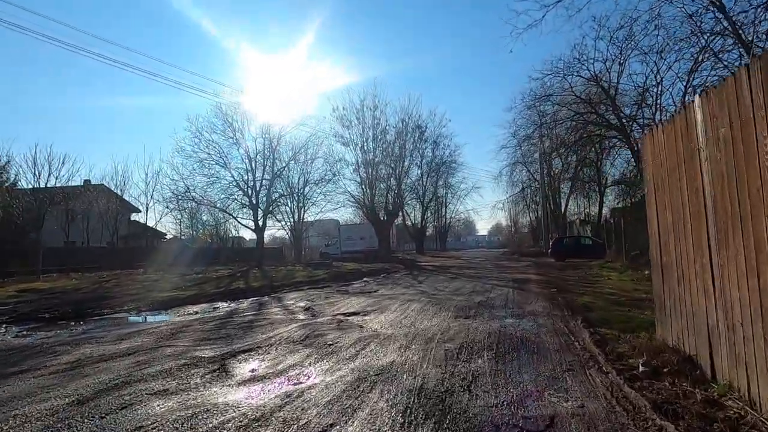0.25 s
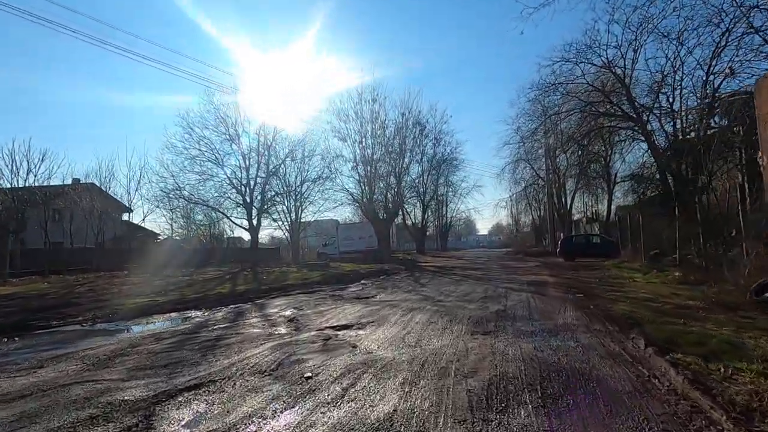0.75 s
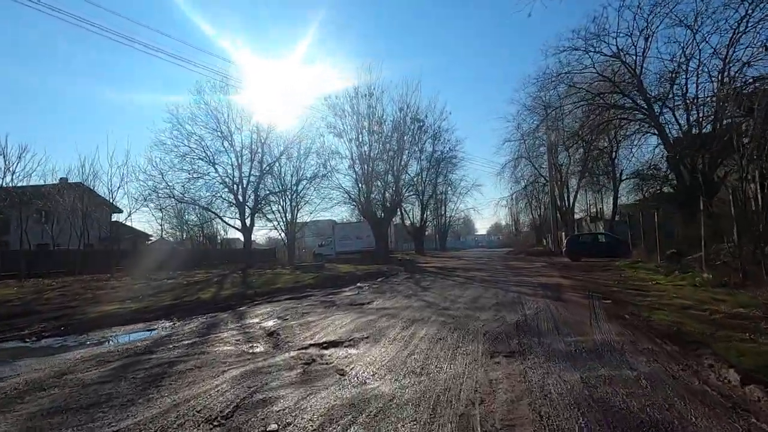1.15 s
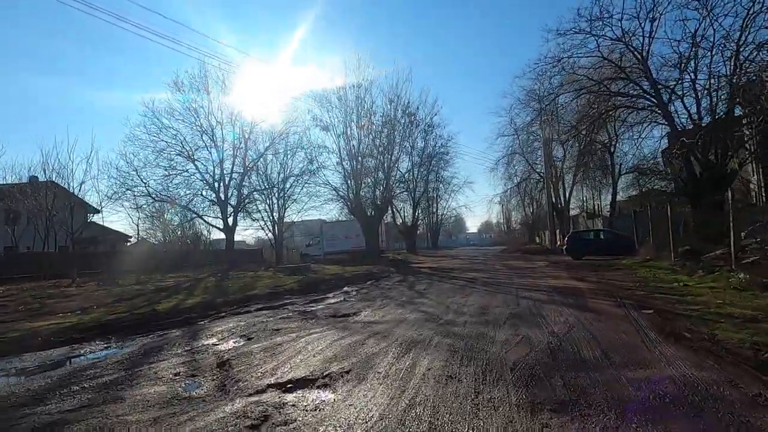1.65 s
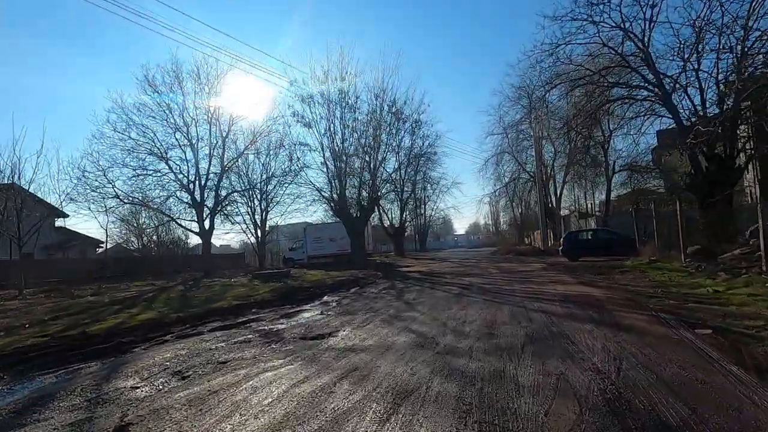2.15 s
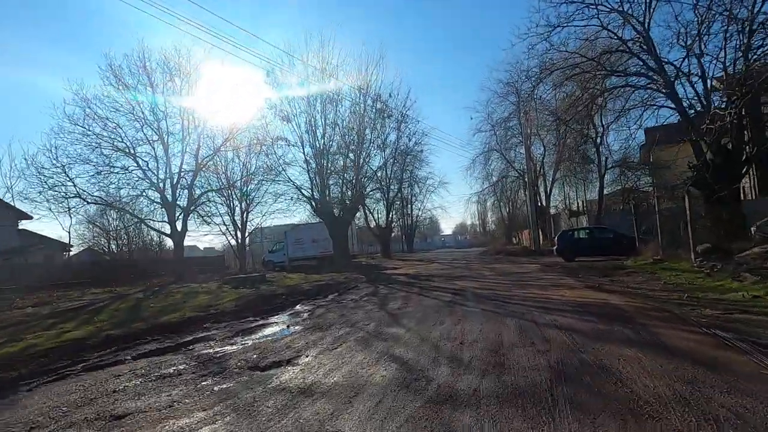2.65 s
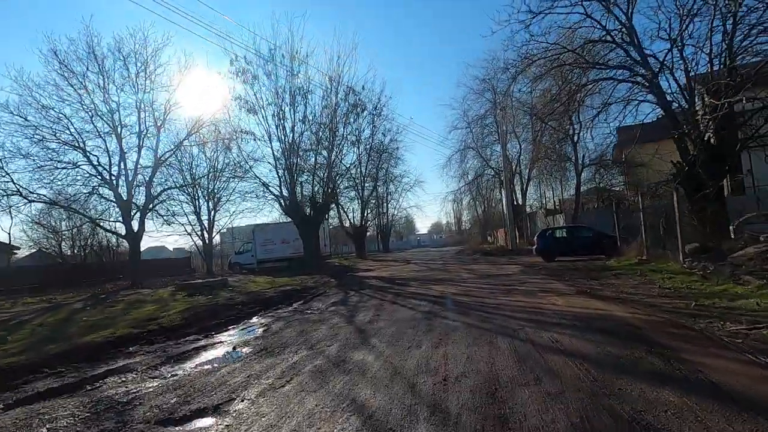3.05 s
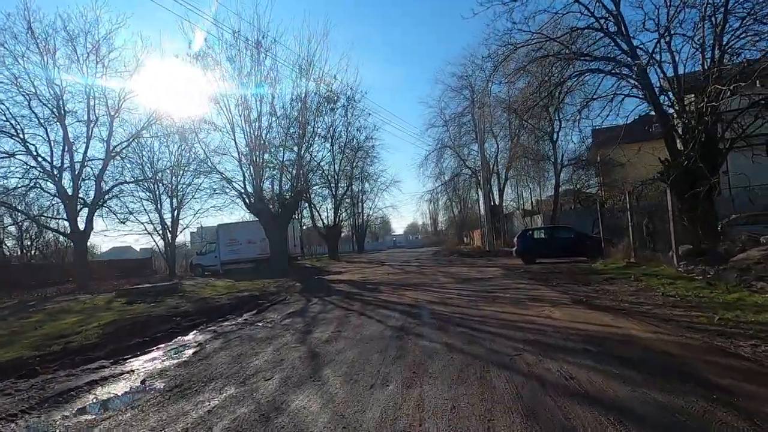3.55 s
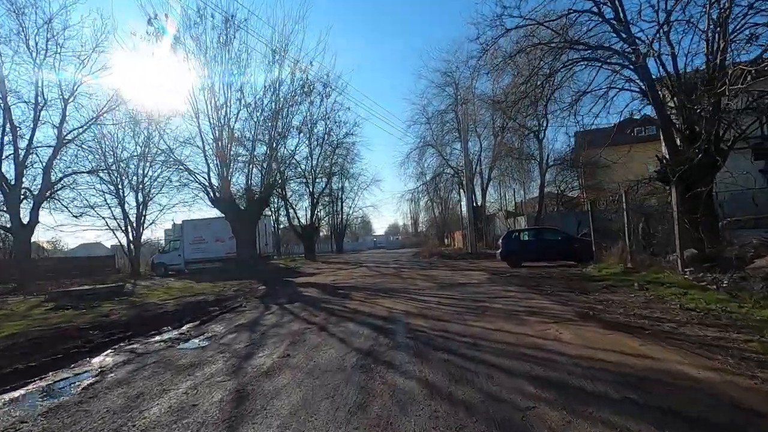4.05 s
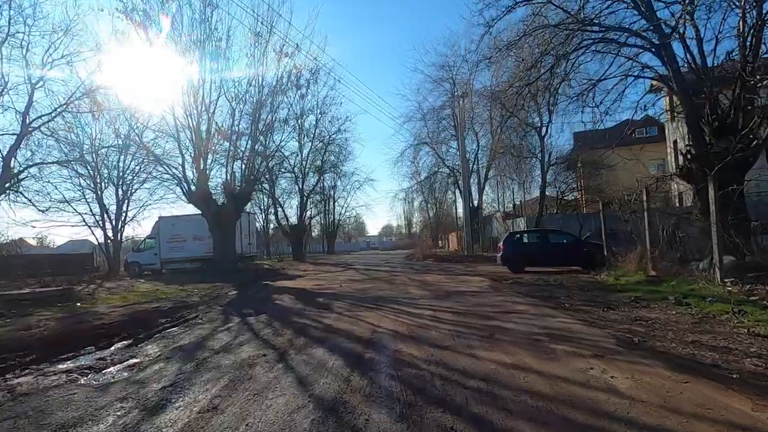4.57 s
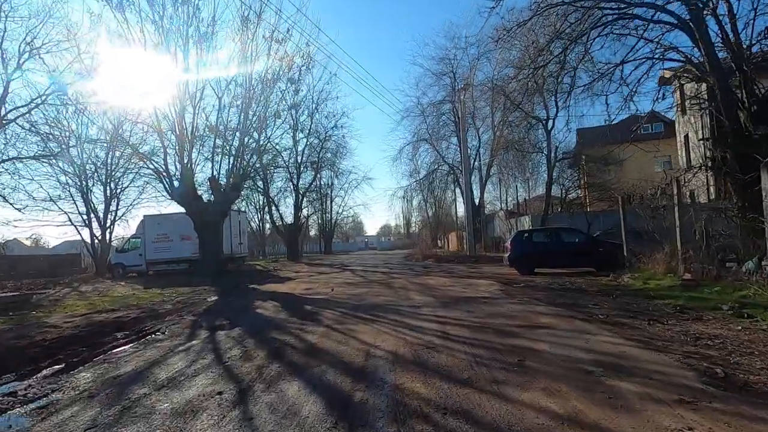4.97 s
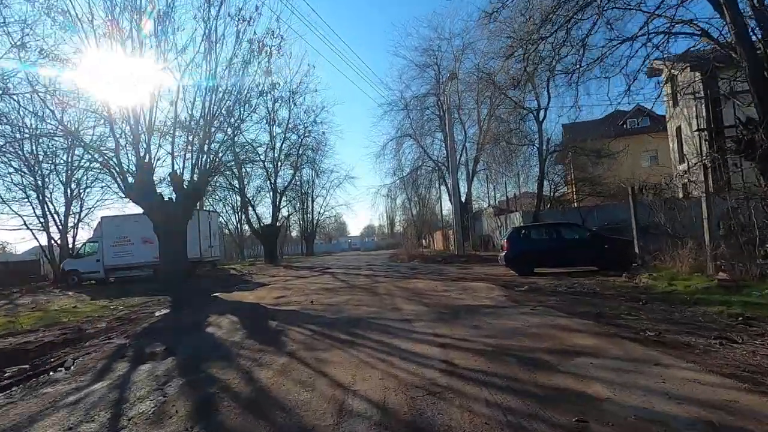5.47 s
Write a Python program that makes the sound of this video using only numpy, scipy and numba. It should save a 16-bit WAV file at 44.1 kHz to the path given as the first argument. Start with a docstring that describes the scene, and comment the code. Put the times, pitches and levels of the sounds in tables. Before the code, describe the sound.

Wet tyre hiss and gritty crackle run throughout as a bicycle rides outdoors over a muddy road. The microphone, mounted on the bike, picks up a low vibrating hum and rumbling gusts of wind, with the treble slightly dull. Bumps bring short rattling knocks, stones pop most loudly around the middle, and the wind builds to a dull thump at the close.

```python
"""A low hum, wind buffets and wet tyre hiss: a bicycle on a dirt road, heard by a small camera fixed to it.
The road shakes the frame into the hum and eddies hit the microphone. The tyres spit water, crack stones
and grind grit; on bumps a loose part knocks against the frame. The camera housing dulls the treble."""
import sys
import numpy as np
from scipy import signal
from scipy.io import wavfile
from scipy.ndimage import uniform_filter1d
from numba import njit

SR = 44100
rng = np.random.default_rng(int(sys.argv[2]) if len(sys.argv) > 2 else 0)


def waveform_to_disk(signal):
    """Save audio, clipped to [-1, 1], as 16-bit WAV at the path in sys.argv[1]."""
    frames = np.transpose(np.atleast_2d(signal))
    scaled = np.clip(frames, -1, 1) * 32767
    samples = np.round(scaled).astype(np.int16)
    wavfile.write(sys.argv[1], SR, samples)


N = 251811

# low frame modes: (frequency [Hz], width [Hz], gain [dB])
FRAME_LOW_MODES = [(319, 68, -15), (560.7, 54, 2.5), (685, 44, 0.5), (848, 257, -10.5)]


def undb(db):
    return 10 ** (np.asarray(db) / 20)


def unit(x):
    return x / np.sqrt(np.mean(x ** 2))


def curves(table):
    """Columns after the time column, interpolated per sample."""
    times_s, *columns = np.transpose(table)
    return [np.interp(np.arange(N) / SR, times_s, column) for column in columns]


@njit
def svf(x, hz, width_hz):
    """State-variable band-pass, moving centre, unity gain there."""
    y, band_state, low_state = np.empty(len(x)), 0., 0.
    for i in range(len(x)):
        g, damping = np.tan(np.pi * hz[i] / SR), width_hz / hz[i]
        v = (band_state + g * (x[i] - low_state)) / (1 + g * (g + damping))
        band_state, low_state = 2 * v - band_state, low_state + 2 * g * v
        y[i] = damping * v
    return y


def band(x, hz, width_hz):
    return svf(x, np.full(len(x), float(hz)), float(width_hz))


def ring(x, modes):
    """A body rings in all its modes, neighbours in opposite polarity."""
    return sum((-1) ** k * undb(db) * band(x, hz, width_hz) for k, (hz, width_hz, db) in enumerate(modes))


def walk(rate_hz):
    """Random steps, smoothed twice; rms 1."""
    hold = int(SR / rate_hz)
    steps = np.repeat(rng.standard_normal(N // hold + 1), hold)
    return unit(uniform_filter1d(uniform_filter1d(steps, hold), hold)[:N])


def even(x, window, share):
    """Flatten the envelope by a share: a strongly driven resonance swings more evenly than noise."""
    swing = np.sqrt(np.abs(uniform_filter1d(x ** 2, size=window))) + 1e-9
    return unit(x / swing ** share)


def add(out, time_s, sound, peak_db):
    start = int(time_s * SR)
    n = min(len(sound), N - start)
    out[start:start + n] += sound[:n] * undb(peak_db) / np.abs(sound).max()


def puffs(rows, rise_s, fade_s):
    """Short noise swells; rows: (time [s], peak [dB], centre [Hz], width [Hz])."""
    out, t = np.zeros(N), np.arange(8000) / SR
    envelope = (1 - np.exp(-t / rise_s)) * np.exp(-t / fade_s)
    for time_s, db, hz, width_hz in rows:
        burst = envelope * rng.standard_normal(len(t))
        add(out, time_s, band(band(burst, hz, width_hz), hz, 2 * width_hz), db)
    return out


def frame_hum():
    """Road bumps drive a low, wandering resonance of frame and mount, with a looser shudder around it."""
    # hum loudness: (time [s], level [dB])
    levels = [(0.0, -36), (0.44, -26), (0.51, -42.5), (0.67, -27), (0.97, -28), (1.06, -19), (1.33, -34.5),
              (1.38, -18), (1.88, -19.5), (1.96, -30.5), (2.02, -20), (2.43, -30.5), (2.56, -19.5),
              (2.75, -19.5), (2.83, -40), (3.08, -13), (3.18, -32.5), (3.23, -27), (3.5, -36.5),
              (3.56, -23.5), (4.31, -34), (4.37, -21.5), (4.56, -32.5), (4.82, -21), (5.69, -29.5),
              (5.71, -51)]
    # hum resonance: (time [s], pitch [Hz])
    pitches = [(0.0, 76.4), (0.35, 71.7), (0.62, 76.5), (0.74, 71.7), (0.92, 79.3), (1.4, 73), (1.7, 78),
               (2.1, 77), (2.36, 69), (2.5, 79.9), (3.1, 77.3), (3.42, 84), (3.95, 75), (4.23, 69.8),
               (4.79, 87), (5.1, 77.6), (5.71, 73)]
    hz = curves(pitches)[0] + 0.97 * walk(5.1)
    tone = svf(svf(rng.standard_normal(N), hz, 7.8), hz, 15.8)
    shudder = band(band(rng.standard_normal(N), 87.3, 31), 97.6, 46)
    hum = even(tone, window=1200, share=0.77) + undb(-10.5) * unit(shudder)
    return undb(curves(levels)[0]) * unit(hum)


def frame_drone(hz=207, width_hz=18.2):
    """A second, fainter frame resonance comes and goes with the road."""
    tone = band(band(rng.standard_normal(N), hz, width_hz), hz, 2 * width_hz)
    return undb(-49.5 + 3.6 * walk(7.5)) * unit(tone)


def wind():
    """Eddies on the microphone: ragged buffet, higher flutter, a deep slow push, single thumps."""
    # wind strength: (time [s], buffet [dB], flutter [dB])
    levels = [(0.0, -49.5, -43), (0.46, -33.5, -46), (0.68, -52.5, -48.5), (1.08, -31, -43.5),
              (1.32, -44, -48.5), (1.45, -26, -43), (1.91, -35.5, -47.5), (2.25, -28.5, -39),
              (2.45, -33.5, -48.5), (2.67, -34, -39.5), (2.72, -22.5, -33), (2.85, -29.5, -49),
              (2.97, -33, -55), (3.04, -29.5, -40), (3.2, -39, -45.5), (3.61, -30, -42.5), (4.0, -33, -42),
              (4.44, -31.5, -43), (4.68, -40, -38.5), (4.74, -20.5, -40), (4.95, -22.5, -42),
              (5.12, -22, -34), (5.2, -24.5, -39), (5.33, -20.5, -31), (5.42, -31, -37), (5.71, -18, -39)]
    # dull wind thumps: (time [s], peak [dB], centre [Hz])
    thumps = [(3.741, -22, 245), (5.637, -13.5, 232), (5.652, -15.5, 34)]
    buffet_db, flutter_db = curves(levels)
    eddies = rng.standard_normal(N) * undb(3.7 * walk(25.07))
    buffet = band(band(eddies, 129.2, 48), 101, 52)
    flutter = band(band(eddies, 192, 43.5), 158, 140)
    flutter += undb(-12.5) * band(band(eddies, 248, 270), 243, 530)
    push = band(band(rng.standard_normal(N), 40.5, 39), 47.6, 38)
    push_db = -15 + 0.5 * uniform_filter1d(buffet_db, size=12000)
    out = undb(buffet_db) * even(buffet, window=1500, share=0.062)
    out += undb(flutter_db) * even(flutter, window=1500, share=0.18)
    out += undb(push_db) * unit(push)
    pulse = np.r_[np.hanning(90), np.zeros(6000)]
    for time_s, db, hz in thumps:
        add(out, time_s, band(band(pulse, hz, 0.77 * hz), hz, 1.1 * hz), db)
    return out


def grit(crunches_per_s=80, grains_per_s=400):
    """Grit under the tread: an envelope of millisecond crunches, and single-grain impulses."""
    crunch = (rng.random(N) < crunches_per_s / SR).astype(float)
    grains = (rng.random(N) < grains_per_s / SR).astype(float)
    crunch *= undb(np.minimum(2 * rng.exponential(size=N), 13))
    grains *= undb(np.minimum(10 * rng.exponential(size=N), 12))
    return unit(np.convolve(crunch, np.hanning(260), "same")), unit(grains)


def tyres(drying_db_per_s=0.67):
    """Tread roll below, grit sizzle above, wet spray on top; the shaking keeps the frame ringing."""
    # rolling noise: (time [s], sizzle gain [dB], roll gain [dB], frame ring level [dB])
    levels = [(0.0, -46.5, -39, -47), (0.16, -47.5, -38, -45.5), (0.4, -50, -41, -50),
              (0.81, -51, -42, -52), (1.2, -52, -41.5, -50.5), (1.56, -46.5, -44, -43),
              (1.8, -50.5, -44, -49), (2.08, -49.5, -40.5, -44.5), (2.25, -53, -45, -51),
              (2.64, -44, -36, -48), (3.07, -46.5, -42.5, -46.5), (3.3, -48, -44.5, -48),
              (3.65, -49.5, -46, -50.5), (4.05, -46.5, -43, -50.5), (4.35, -45, -46, -51),
              (4.65, -49.5, -48, -56), (4.78, -48.5, -48, -47), (4.94, -46, -42, -43.5),
              (5.12, -47, -41, -41.5), (5.2, -43, -44, -56), (5.3, -45.5, -38, -44),
              (5.39, -45.5, -41.5, -48), (5.71, -44.5, -40, -49)]
    # hiss spectrum, added to each layer's gain: (frequency [Hz], density [dB])
    spectrum = [(300, 8), (500, -9), (800, -2.5), (1400, 2.5), (2100, 0), (3400, 6), (4600, 6.5),
                (6000, -4.5), (8000, -6.5), (11000, -13), (13000, -9.5), (15000, -11)]
    sizzle_db, roll_db, ring_db = curves(levels)
    hiss_hz, hiss_db = np.transpose(spectrum)
    spray_db = -36.5 + 0.63 * (sizzle_db + 48) + 0.8 * walk(5.98)
    spray_db -= drying_db_per_s * (np.arange(N) - N / 2) / SR
    patchy_db = 0.61 * walk(27.25)
    coarse_crunch, coarse_grains = grit()
    medium_crunch, medium_grains = grit()
    fine_crunch, fine_grains = grit()
    out = np.zeros(N)
    for hz in np.r_[300 * 2 ** np.arange(0, 5.2, 1 / 3), 10800, 12000, 13200, 14400]:
        # octave-wide crossfades between layers and between grit sizes
        mid = np.clip(np.log2(hz / 1910), 0, 1)
        top = np.clip(np.log2(hz / 4700), 0, 1)
        crunch = (1 - mid) * coarse_crunch + (mid - 0.75 * top) * medium_crunch + 0.33 * top * fine_crunch
        grains = (1 - mid) * coarse_grains + (mid - 0.34 * top) * medium_grains + 0.3 * top * fine_grains
        source = rng.standard_normal(N) * (1 + 0.5 * crunch) - 0.5 * grains
        db = (1 - mid) * roll_db + (mid - top) * sizzle_db + top * spray_db
        db += np.interp(np.log(hz), np.log(hiss_hz), hiss_db)
        db += patchy_db + (1.8 - 0.9 * top) * walk(14)
        out += undb(db) * band(band(source, hz, hz / 3), hz, hz / 2)
    shake = rng.standard_normal(N) * undb(1.3 * walk(25))
    return out + undb(ring_db) * unit(ring(shake, FRAME_LOW_MODES))


def pings(rise_s=0.0036):
    """Faint short rings, each a damped sine."""
    # rings: (time [s], peak [dB], pitch [Hz], fade [s])
    rings = [(.075, -46, 1034, 0.069), (0.102, -35.5, 973, 0.016), (2.049, -37, 509, 0.052),
             (4.76, -38.5, 536, 0.11), (4.849, -29, 510, 0.023), (5.3, -37.5, 531, 0.036)]
    out, t = np.zeros(N), np.arange(12000) / SR
    for time_s, db, hz, fade_s in rings:
        envelope = (1 - np.exp(-t / rise_s)) * np.exp(-t / fade_s)
        add(out, time_s, np.sin(2 * np.pi * hz * t) * envelope, db)
    return out


def water_spits(hz=10600, width_hz=17000):
    """Water thrown off the tread in short sizzles."""
    # spits: (time [s], peak before the housing [dB])
    spits = [(0.267, -33), (.59, -32.5), (0.659, -36), (.90, -44), (1.21, -31.5), (1.355, -30.5),
             (1.502, -35), (1.799, -32), (1.99, -31), (2.46, -36), (3.433, -37), (3.939, -34), (4.329, -32),
             (4.64, -34), (4.789, -37), (4.895, -43), (5.21, -34)]
    return puffs([(time_s, db, hz, width_hz) for time_s, db in spits], rise_s=0.0046, fade_s=0.02)


def random_stones(count=12):
    """Further stones crack at random times; rows as in stone_cracks."""
    when, strength, pitch = rng.random((count, 3)).T
    times_s = 0.01 + when * (N / SR - 0.1)
    db = -27.5 - 8 * strength
    return list(zip(times_s, db, np.interp(pitch, (0, 1), (2200, 4370)), db - 27))


def stone_cracks(grind_s=0.002, crumble_s=0.0049):
    """A stone breaks under the tread: brief grinding, a sharp snap with a duller pop, then crumbling."""
    # stones at set times: (time [s], snap peak [dB], centre [Hz], pop peak [dB])
    stones = [(0.2792, -26, 4500, -45), (0.3135, -28, 2100, -37), (0.6124, -30, 1900, -35),
              (0.7522, -26.5, 4900, -48), (1.2081, -21, 4030, -20), (1.3516, -27.5, 2240, -58),
              (1.468, -28, 1740, -30), (1.489, -26, 4430, -56), (1.6926, -32, 2100, -45),
              (1.9699, -38, 2760, -50), (2.0637, -31, 1700, -36), (2.2458, -33, 2330, -43),
              (1.669, -30, 4700, -45), (1.763, -28, 3960, -50), (1.775, -27, 3600, -52),
              (1.628, -37, 3900, -57), (1.633, -33, 4500, -55), (2.041, -27, 2420, -30),
              (2.157, -27.5, 4000, -48), (2.4275, -25, 3050, -55), (2.6091, -10.5, 2540, -15),
              (2.616, -24, 3440, -46), (2.623, -22, 3110, -30), (2.637, -24, 3000, -27),
              (2.669, -24.5, 3000, -45), (2.6559, -23, 2510, -46), (2.6763, -19, 3850, -46),
              (2.6934, -16, 2900, -23.5), (2.7079, -14, 2390, -15), (2.809, -14.5, 4000, -47),
              (2.83, -32, 3800, -50), (2.8714, -29, 2400, -47), (2.9003, -34, 4300, -47),
              (2.9348, -17.5, 2560, -64), (3.0086, -14, 4340, -37), (3.014, -26, 4400, -31),
              (3.2303, -31, 3280, -62), (3.3194, -31, 4300, -35), (3.356, -23, 3560, -35),
              (3.3675, -27, 3930, -53), (3.438, -21, 4020, -35), (3.5063, -28, 3750, -46),
              (3.5773, -25.5, 2550, -54), (3.7678, -30, 2310, -45), (4.0262, -33, 2660, -45),
              (4.0826, -30, 2850, -45), (4.4742, -32, 4370, -52), (4.7671, -31, 3360, -48),
              (4.7865, -29, 4500, -40), (5.3093, -31, 3490, -50), (5.3462, -37, 3680, -50),
              (5.3817, -30, 4530, -56), (5.5657, -38, 2200, -42), (4.3283, -29, 3460, -53),
              (4.4205, -23, 3330, -38), (4.6393, -27.5, 2770, -46), (5.0042, -20.5, 3970, -52),
              (5.144, -26, 3640, -55), (5.259, -20, 2030, -17.5), (5.278, -34, 3270, -30),
              (5.4545, -18, 3240, -23), (5.596, -28, 4000, -45), (5.6725, -21.5, 2600, -29)]
    out, t = np.zeros(N), np.arange(2048) / SR - 0.004
    envelope = np.where(t < 0, 0.3 * np.exp(t / grind_s), np.exp(-t / crumble_s))
    lowpass = signal.butter(4, 6200, fs=SR, output="sos")
    for time_s, snap_db, hz, pop_db in list(stones) + random_stones():
        force = undb(-19.5) * rng.standard_normal(len(t)) * envelope
        # big stones break at once, small ones mostly crumble
        force[np.argmax(t >= 0)] -= np.clip((snap_db + 30) / 8, 0.7, 2.4)
        force = signal.sosfilt(lowpass, np.convolve(force, np.hanning(5), "same"))
        snap = band(force, hz, 830) + 0.47 * band(force, 4550, 3600)
        start_s = time_s - 0.0018
        add(out, start_s, band(snap, 2350, 4000), snap_db)
        add(out, start_s, band(band(force, 1300, 1200), 1400, 2200), pop_db)
    return out


def wind_gusts():
    """Rough gusts rumble briefly on the microphone."""
    # gusts: (time [s], peak [dB], centre [Hz])
    gusts = [(1.481, -24, 208), (2.241, -29.5, 202), (2.58, -29, 199), (2.621, -25, 225), (2.658, -28, 298),
             (2.681, -25, 196), (2.704, -29.5, 308), (2.845, -25, 255), (2.864, -29.5, 328),
             (2.888, -39, 220), (3.438, -37, 200), (3.701, -24, 226), (4.76, -28.5, 230), (4.94, -31, 258),
             (5.089, -27, 240), (5.301, -24, 221)]
    return puffs([(time_s, db, hz, 0.34 * hz) for time_s, db, hz in gusts], rise_s=0.0064, fade_s=0.021)


def grit_crunches():
    """A patch of grit grinds under the tread for a moment."""
    # grit patches: (time [s], peak [dB], centre [Hz])
    patches = [(1.524, -31, 2000), (2.19, -33, 2500), (2.595, -25, 4200), (2.734, -34, 3500),
               (3.227, -32.5, 4200), (3.285, -31, 3970), (3.349, -32, 4200), (3.399, -33, 4000),
               (3.433, -28.5, 4020), (3.895, -36, 3200), (3.915, -32.5, 3500), (3.945, -33, 2800),
               (3.995, -29.5, 3300), (4.089, -37, 1500), (4.261, -40, 1490), (5.276, -32, 3280)]
    return puffs([(time_s, db, hz, 0.77 * hz) for time_s, db, hz in patches], rise_s=0.0036, fade_s=0.011)


def knocks(scuff_s=0.0028, rattle_s=0.0083):
    """A loose part scuffs, strikes and rattles, ringing the frame a little differently each time."""
    # strikes: (time [s], high ring peak [dB], low ring peak [dB], treble peak [dB], air peak [dB],
    # high ring pitch [ratio], rise [s])
    strikes = [(1.5385, -19, -14, -20, -36, 0.86, 0.0014), (1.5505, -36, -19, -25.5, -44, 1.0, .002),
               (1.8807, -19, -19, -31.5, -36, 0.96, .0008), (2.2061, -19, -23.5, -25, -29, 1.02, 0.0021),
               (2.537, -18, -21, -20, -39, 1.02, 0.003), (3.102, -25.5, -26, -35, -43, 0.98, 0.003),
               (3.4663, -16, -19, -24.5, -34, 0.96, 0.0017), (3.839, -23, -29.5, -27.5, -48, 1.03, 0.0021),
               (4.1246, -20.5, -29.5, -29, -52, 0.94, 0.0012),
               (4.857, -27.5, -29.5, -37, -41, 0.88, 0.00089), (5.065, -26.5, -32, -40, -48, 1.1, 0.0017)]
    # high frame modes: (frequency [Hz], width [Hz], gain [dB])
    frame_high_modes = [(1090, 190, -8.5), (1470, 240, -8), (2290, 300, -4), (2720, 280, 2),
                        (3200, 870, -11)]
    out, t = np.zeros(N), np.arange(4096) / SR - 0.021
    after_s = np.maximum(t, 0)
    scuff = undb(-20.5) * np.exp(-np.abs(t) / scuff_s)
    for time_s, high_db, low_db, treble_db, air_db, ratio, rise_s in strikes:
        rattle = (1 - np.exp(-after_s / rise_s)) ** 2 * np.exp(-after_s / rattle_s)
        noise = rng.standard_normal((3, len(t)))
        noise[:2, np.argmax(rattle)] += 4.5  # hard contact, into both rings
        high_noise, low_noise, treble_noise = noise
        high_modes = np.array(frame_high_modes) * [ratio, 1, 1]
        high_modes += rng.standard_normal(high_modes.shape) * [30, 0, 1.2]
        low_modes = np.array(FRAME_LOW_MODES)
        low_modes += rng.standard_normal(low_modes.shape) * [10, 0, 1.5]
        start_s = time_s - 0.022
        add(out, start_s, ring(high_noise * (rattle + scuff), high_modes), high_db)
        add(out, start_s, ring(low_noise * rattle, low_modes), low_db)
        add(out, start_s, band(treble_noise * rattle, 4840, 2300), treble_db)
        add(out, start_s, band(band(treble_noise * rattle, 7400, 1600), 7400, 2400), air_db)
    return out


def scene():
    """Mono mix at the camera."""
    rumble = frame_hum() + frame_drone() + wind() + wind_gusts()
    hiss = tyres() + water_spits()
    impacts = knocks() + stone_cracks() + grit_crunches() + pings()
    return (rumble + hiss + impacts)[None]


def record(dry):
    """The housing dulls the treble; the camera cuts the top."""
    housing_hz, top_hz = 6010, 15600
    housed = signal.sosfilt(signal.butter(3, housing_hz, fs=SR, output="sos"), dry)
    return signal.sosfilt(signal.ellip(8, 0.2, 70, top_hz, fs=SR, output="sos"), housed)


dry = scene()
out = record(dry)
waveform_to_disk(out)
```